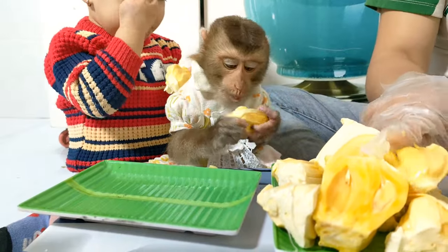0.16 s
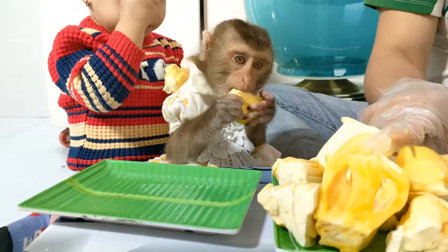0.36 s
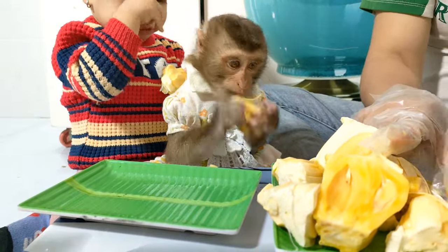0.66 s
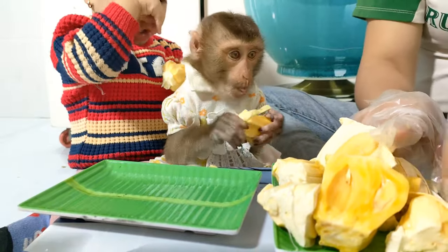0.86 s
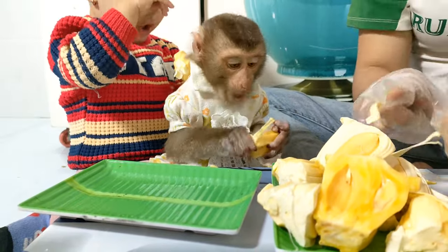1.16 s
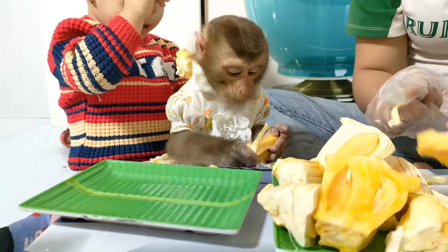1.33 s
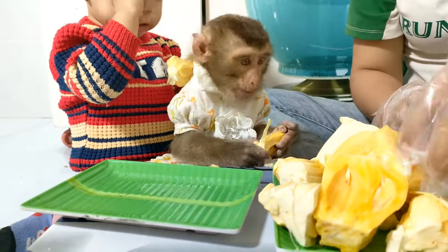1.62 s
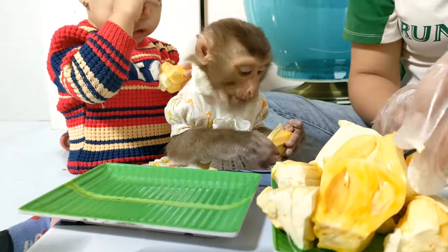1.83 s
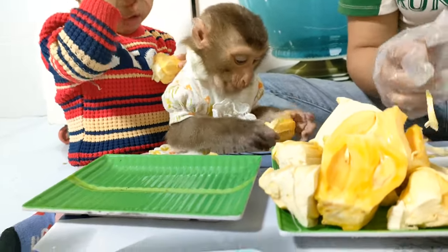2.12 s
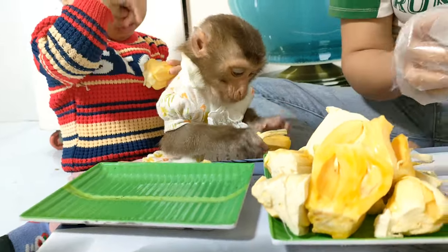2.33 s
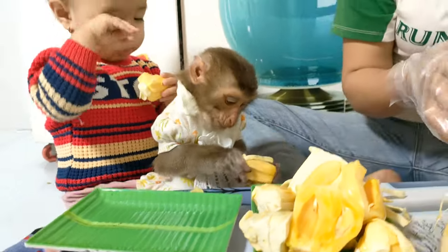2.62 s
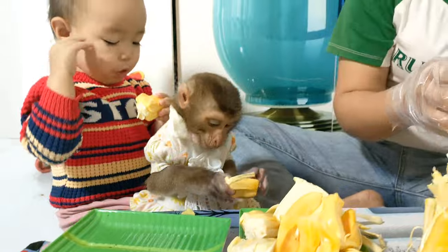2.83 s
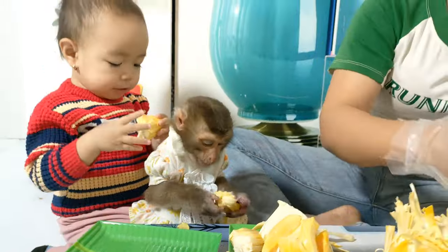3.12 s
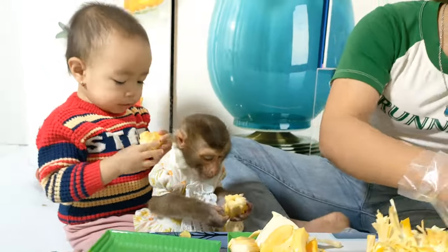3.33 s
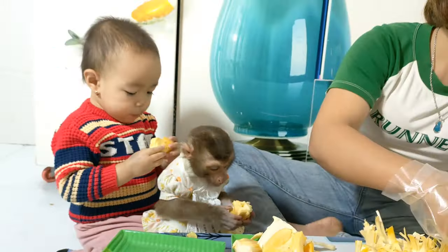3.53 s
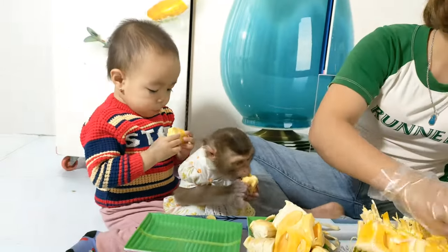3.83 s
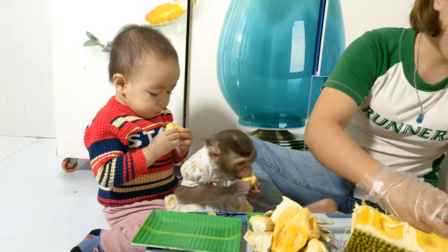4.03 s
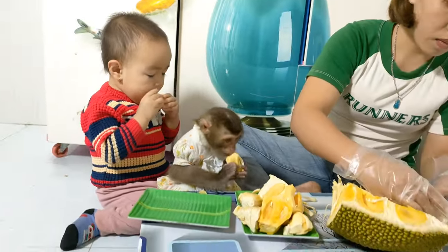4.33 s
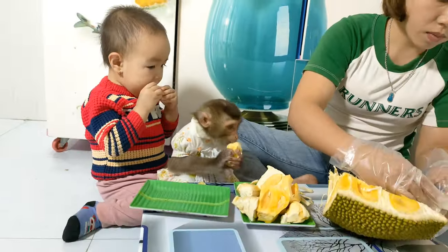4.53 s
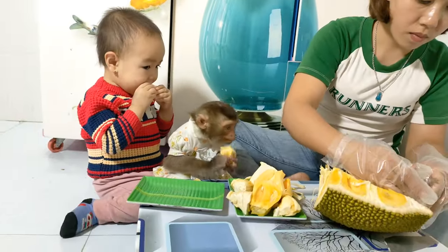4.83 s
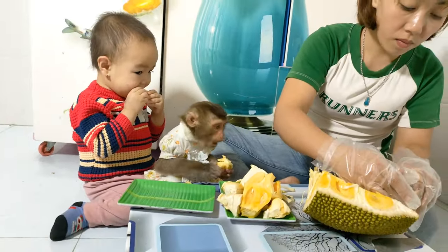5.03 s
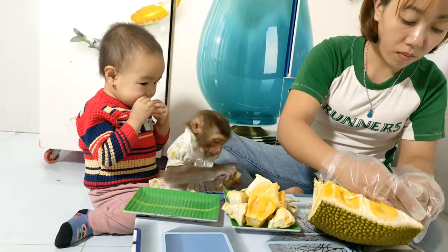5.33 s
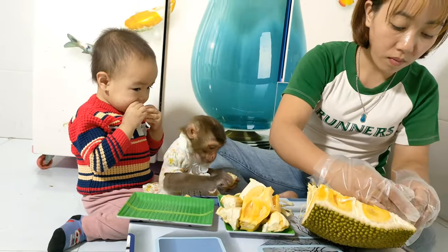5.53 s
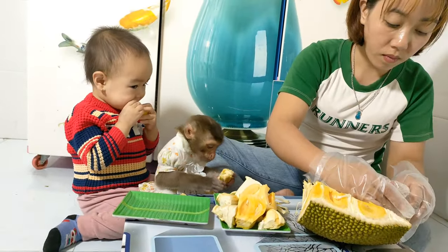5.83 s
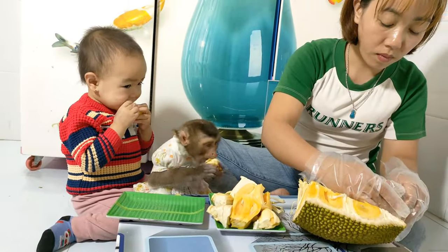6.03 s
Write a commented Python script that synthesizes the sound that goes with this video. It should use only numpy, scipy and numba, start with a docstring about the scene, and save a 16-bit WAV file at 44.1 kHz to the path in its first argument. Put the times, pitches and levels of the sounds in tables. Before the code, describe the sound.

Thin plastic gloves crinkle from the start as hands pull sticky fruit apart, about a metre from a phone in a tiled room. For the first two seconds the crackle is bright and leans left, with many sharp single snaps. Fruit and fingers thud softly on a tray around 0.3 and 1.2 seconds, and small wet ticks of pulp are scattered throughout. From 2 to 2.7 seconds the rustle grows denser and louder but less crisp. It swells again just after 3 seconds and near 3.9, where a sharper wet tick stands out. A faint hollow rub passes at about 4.4 seconds. Lighter crinkling continues to 5.5 seconds, nearly stops, then returns just after 6 with a tiny, thin rising squeak. A short reverberation and a quiet room hum and hiss lie under everything.

```python
"""Thin plastic gloves crinkle as hands pull sticky fruit apart, a metre from a phone in a tiled room.
Creases in the film buckle, each a click and a brief ring: swarms of tiny snaps with louder single ones.
Fruit and fingers thud softly on a tray and pulp lets go with wet ticks, both as damped modes.
A faint hollow rub and a thin rising squeak come late. The tiles add a short reverberation
over the room's hum and hiss, and the phone's two microphone ports give left and right."""
import sys
import numpy as np
from scipy import signal
from scipy.fft import rfft, irfft
from scipy.io import wavfile
from scipy.ndimage import uniform_filter1d
from numba import njit

SR = 44100
rng = np.random.default_rng(int(sys.argv[2]) if len(sys.argv) > 2 else 0)


def dump(signal):
    """Clip the signal to [-1, 1] and save it as 16-bit WAV at the path in sys.argv[1]."""
    limited = np.clip(np.atleast_2d(signal).T, -1, 1)
    pcm = np.round(limited * 32767).astype(np.int16)
    wavfile.write(sys.argv[1], SR, pcm)


N = 271656

# spectral envelope of the crinkling as heard: f/Hz, gain/dB; the treble falls steeply above 6.8 kHz to a notch
# near 7.8 kHz
CRINKLE_SPECTRUM = [(100, -42.5), (160, -12.5), (310, -12), (700, -12.5), (1000, -5.5), (1460, -9.5),
                    (2000, -1.5), (2400, 0), (2700, 5), (3900, 7), (5000, -1), (6000, -7.5), (6800, -17.5),
                    (7300, -27.5), (7800, -40.5), (8500, -34), (9400, -28), (11200, -24.5), (13600, -34),
                    (14600, -36)]
# coherence of left and right: f/Hz, coherence (0-1)
COHERENCE = [(40, 0.37), (130, .5), (400, .5), (850, .8), (1400, .3), (2500, .05)]
# colour and side of the rustle: t/s, crisp gain/dB, sheen gain/dB, body gain/dB, main left minus right/dB
FILM_FACING = [(0, 15, 4, 11, 8), (.3, 10.5, 5.5, 4.5, 7), (.5, 12.5, 5, 8, 7.5), (.65, 12.5, 1, 7.5, 6.5),
               (.85, 16, 7, 10, 8.5), (1.15, 10.5, 6, 12.5, 7.5), (1.45, 15, 11.5, 10.5, 6.5),
               (1.75, 10.5, 6.5, 9.5, 7), (2.1, 1.5, 0.5, 1, 6.5), (2.3, -7, 0, 3, 8),
               (2.5, -9, 1.5, -2, 4), (2.63, -27, -4, 4, 4.5), (2.85, -23, 5.5, 5.5, 4.5),
               (3.1, -10, 6, 5.5, 4.5), (3.4, -6, 2, 2.5, 1.5), (3.7, -4, 2.5, 1, 2), (4, -1.5, 4, 3, 4.5),
               (4.3, 6.5, -2, 2.5, 4), (4.45, 11, 7, 6, 6), (4.6, 13, 6, 6.5, 4), (4.85, 7.5, 6.5, 3.5, 2),
               (5.1, 1.5, 4, 0, 0.5), (5.22, 5, 5.5, 6, 2), (5.36, 12.5, 11, 6, 3), (5.5, 9, 6.5, 2.5, 3.5),
               (5.8, 3, 5, 10, 6), (6.16, 9, 13, 5.5, 5)]
# left minus right in the treble as the phone turns: t/s, crisp band/dB, sheen band/dB
TREBLE_BALANCE = [(0, 16, 15), (1.5, 19, 16.5), (2.9, 0, 6.5), (3.5, -13, 6.5), (4.4, -11, 2),
                  (4.8, -8, -2), (5.6, -14, -2), (6.16, -10, -2)]


def undb(db):
    """Amplitude ratio of a level."""
    return 10 ** (np.asarray(db) / 20)


def at_times(table, t):
    """Columns of a (t/s, ...) table, interpolated at times t."""
    times, *columns = np.transpose(table)
    return [np.interp(t, times, column) for column in columns]


def at_frequencies(table, hz):
    """An (f/Hz, value) table, interpolated on a logarithmic frequency axis."""
    f, values = np.transpose(table)
    return np.interp(np.log(hz + 1), np.log(f), values)


def wander(rate_hz):
    """Slow modulation: random values joined by straight ramps."""
    hold = int(SR / rate_hz)
    return 0.52 * uniform_filter1d(np.repeat(rng.standard_normal(N // hold + 1), hold), hold)[:N]


def superpose(onsets, sounds):
    """Linear superposition: short stereo sounds add, each from its onset."""
    out = np.zeros((2, N))
    for t, sound in zip(onsets, sounds):
        start = max(int(t * SR), 0)
        out[:, start:start + sound.shape[1]] += sound[:, :N - start]
    return out


def crinkle_response(size):
    """Causality: the crinkle's spectrum as a minimum-phase filter, by folding its cepstrum."""
    gain_db = at_frequencies(CRINKLE_SPECTRUM, np.fft.rfftfreq(size, 1 / SR))
    cepstrum = irfft(gain_db * np.log(10) / 20, size)
    cepstrum[1:size // 2] *= 2
    cepstrum[size // 2 + 1:] = 0
    return np.exp(rfft(cepstrum))


def bands(f, edges_hz=(2174, 5566, 7050)):
    """Complementary crossover: body, main, crisp and sheen bands, low to high, sum to one."""
    above = [1, *(1 / (1 + (edge / (f + 1)) ** 10) for edge in edges_hz), 0]
    return [lower - upper for lower, upper in zip(above, above[1:])]


def shadow_db(t):
    """Diffraction: left minus right in each band; long waves bend round the phone and cast no shadow."""
    return [0 * t, at_times(FILM_FACING, t)[3], *at_times(TREBLE_BALANCE, t)]


def cohere(spectra, f):
    """Spatial coherence: long waves reach both ports partly alike, short ones hardly so."""
    coherence = at_frequencies(COHERENCE, f)
    mid, side = (spectra[0] + spectra[1]) / 2, (spectra[0] - spectra[1]) / 2
    return np.array([np.sqrt(1 + coherence) * mid + k * np.sqrt(1 - coherence) * side for k in (1, -1)])


@njit
def patch_rings(starts, hz, t60, amplitude):
    """Free vibration: each buckled patch rings at its own frequency and decays exponentially."""
    out = np.zeros(N)
    for k in range(len(starts)):
        pole = np.exp(2j * np.pi * hz[k] / SR - np.log(1000.) / (t60[k] * SR))
        phasor = amplitude[k] + 0j
        for i in range(starts[k], min(starts[k] + int(t60[k] * SR * .7) + 2, N)):
            out[i] += phasor.real
            phasor *= pole
    return out


def rustle(count=24000, click_db=1.5, burst_db=2.2, flicker_db=2.2):
    """Buckling: swarms of creases each radiate a click and a ring, met at another angle by each port."""
    # how hard the hands work the film: t/s, level/dB
    effort = [(0, -48.5), (.09, -58), (.19, -48), (.36, -46), (.43, -42.5), (.5, -43.5), (.59, -43.5),
              (.66, -53), (.695, -44.5), (.72, -51.5), (.815, -50.5), (.84, -44), (.875, -46.5), (.9, -48),
              (.925, -52), (.95, -56), (1.02, -49), (1.12, -57.5), (1.2, -53.5), (1.34, -53), (1.445, -53),
              (1.47, -48), (1.5, -46), (1.525, -49.5), (1.59, -54), (1.74, -53), (1.91, -50), (1.98, -48.5),
              (2.03, -39.5), (2.13, -48.5), (2.19, -35.5), (2.29, -33.5), (2.345, -35.5), (2.36, -39.5),
              (2.43, -39), (2.5, -45.5), (2.63, -32), (2.79, -47), (2.9, -46.5), (3.04, -45.5), (3.06, -37),
              (3.1, -40.5), (3.17, -43), (3.2, -37.5), (3.225, -41), (3.27, -41), (3.34, -39),
              (3.49, -42.5), (3.57, -45.5), (3.67, -45.5), (3.73, -48.5), (3.82, -47), (3.845, -39.5),
              (3.86, -35), (3.95, -38), (4.07, -41), (4.15, -39.5), (4.19, -45.5), (4.29, -49),
              (4.41, -53.5), (4.51, -50.5), (4.54, -50), (4.6, -44), (4.73, -50), (4.8, -46.5), (4.97, -48),
              (5.03, -48), (5.15, -51.5), (5.18, -45), (5.24, -45.5), (5.37, -53.5), (5.46, -43.5),
              (5.74, -64), (6.09, -63.5), (6.16, -40.5)]
    spread_db, largest_db = 4., 12.  # crease strength above the weakest
    pocket_low_hz, pocket_high_hz, pocket_s, pocket_share = 2400, 5600, .04, .22
    t, f = np.arange(N) / SR, np.fft.rfftfreq(N, 1 / SR)
    when, strength, polarity, pitch, decay, *angle, pocket_draw = rng.random((count, 8)).T
    amplitude = undb(np.minimum(-spread_db * np.log(1 - strength), largest_db)) * np.sign(polarity - .5)
    t60 = .016 * (1.7 + decay)
    # for a moment the crumpled film holds two pockets, and many creases ring near their pitches
    pocket_pitch = rng.random((int(N / SR / pocket_s) + 1, 2))
    pockets = pocket_low_hz * (pocket_high_hz / pocket_low_hz) ** pocket_pitch
    pocket_hz = pockets[(when * N / SR / pocket_s).astype(int), (decay > .5).astype(int)]
    nominal_hz = np.where(pocket_draw < pocket_share, pocket_hz, 60 + 14800 * pitch ** 1.209)
    swarm = np.zeros((2, N))
    for port in range(2):
        starts = np.clip((when * N + 40 * angle[port]).astype(np.int64), 0, N - 1)
        hz = nominal_hz * (1.039 + 0.106 * angle[1 - port])
        swarm[port] = patch_rings(starts, hz, t60, amplitude / np.sqrt(t60 * SR / 14))
        np.add.at(swarm[port], starts, amplitude * undb(click_db))
    # one crease sets off its neighbours, so the swarm comes in bursts
    swarm *= undb(burst_db * wander(70))
    spectrum = cohere(rfft(swarm), f) * crinkle_response(N)
    parts = [irfft(spectrum * band, N) for band in bands(f)]
    crisp_db, sheen_db, body_db, _ = at_times(FILM_FACING, t)
    film = sum(part * undb(gain_db + side_db * [[.5], [-.5]] + flicker_db * wander(30))
               for part, gain_db, side_db in zip(parts, (body_db, 0, crisp_db, sheen_db), shadow_db(t)))
    main_rms = np.std(parts[1].mean(0))
    return film / main_rms * undb(at_times(effort, t)[0])


def room_tone(level_db=-57, balance_db=4):
    """Ambient noise: the room's quiet hum and hiss form a continuous spectrum."""
    # spectral density of the room's noise: f/Hz, relative level/dB
    density = [(12, -18), (20, 11), (124, 1.5), (189, 4.5), (656, -21.5), (2220, 4.5), (3650, 3.5),
               (6180, -7.5), (8160, -35.5), (11400, -22.5), (15000, -37)]
    f = np.fft.rfftfreq(N, 1 / SR)
    white = cohere(rfft(rng.standard_normal((2, N))), f)
    noise = irfft(white * undb(at_frequencies(density, f)), N)
    pan = undb([[balance_db / 2], [-balance_db / 2]])
    return noise / np.std(noise.mean(0)) * undb(level_db + 0.5 * wander(4.56)) * pan


def snaps(flip_db=5, ring_db=1.0, relative_bandwidth=.38, size=2048):
    """Snap-through: a crease flips with a click and a ring; the film around gives way in a patter."""
    # single creases: t/s, peak level/dB, ring f/Hz, crisp gain/dB, sheen gain/dB, patter gain/dB
    creases = [(0.025, -30, 5060, 17, 6, -5), (0.0629, -28, 4260, 23, -3, -9),
               (0.1043, -19, 4000, 18, 15, -16), (0.1141, -38, 5560, 22, 11, -10),
               (0.1528, -24.5, 3830, 29, 11, -7), (0.1639, -24, 3960, 22, 13, -8.5),
               (0.1901, -23.5, 3750, 5, 7, -11), (0.2319, -22.5, 4480, 18, 10, -9.5),
               (0.2817, -21.5, 4110, -3, 1, -15), (0.3246, -17, 2780, 16, -5, -7),
               (0.3494, -23, 4910, 7, 4, -8), (0.3867, -24, 5360, 14, 1, -5),
               (0.3939, -26, 4110, 6, 3, -14), (0.4201, -22.5, 3900, -6, -2, 1),
               (0.4272, -22.5, 2880, 1, 2, -2), (0.4525, -32, 3750, 3, 0, -8),
               (0.4793, -24.5, 3960, 15, 19, -5), (0.496, -21, 3010, -7, 6, -25),
               (0.5205, -20.5, 3920, 5, -2, -6), (0.5633, -15, 3060, 6, 5, -13),
               (0.6932, -32, 5190, 5, 4, -3), (0.7396, -27, 4200, 10, -2, -10),
               (0.7519, -15.5, 5840, 27, 5.5, -16), (0.8273, -27, 3920, 31, 9, -9),
               (0.8414, -24, 3080, 11, 4, 0), (0.8559, -26, 3060, -3, -6, -11),
               (0.8686, -12.5, 3150, 6, 9, -15), (0.8842, -19.5, 4260, 13, -7, -10.5),
               (0.8998, -24, 3120, 1, -4, -10), (0.9664, -27, 3010, 7, 6, -15),
               (1.0004, -21.5, 3030, -3, 0, -9), (1.0153, -30, 3640, 16, 14, -12),
               (1.0233, -25, 3320, 6, 1, -22), (1.044, -29, 3120, 7, 6, -8),
               (1.1665, -31, 4000, 1, -11, -4), (1.2108, -25.5, 4100, 15, 12, -9.5),
               (1.2315, -29, 3940, -5, 2, -11), (1.2394, -23, 4130, 19, 11, -10),
               (1.254, -24, 4480, 6, 11, -13), (1.2656, -40, 4670, 1, -5, -7),
               (1.3269, -21, 3960, 4, 9, -13), (1.3389, -24, 2980, 19, 16, -14),
               (1.3496, -30, 4130, 16, 6, -10), (1.3638, -29, 5660, 17, 12, -15),
               (1.393, -28, 3250, 23, 13, -9), (1.3998, -24, 2780, 6, 7, -20),
               (1.4098, -30, 2930, 12, 0, -2), (1.4273, -20, 5300, 8, 5, -11),
               (1.4574, -27, 4330, 13, 6, -5), (1.4713, -27, 5040, 11, 10, -4),
               (1.4884, -24, 4650, 10, 0, -9), (1.5137, -26, 3920, 6, 13, -18),
               (1.5361, -18, 4970, 18, 4, -13.5), (1.5466, -27, 3920, 11, 3, -7),
               (1.6002, -36, 4440, 15, -8, -19), (1.6113, -34, 3010, 10, 1, -6),
               (1.6176, -15.5, 4630, 5, -3, -14.5), (1.6468, -30, 4180, 20, 8, -12),
               (1.6783, -22.5, 4300, -15, -12, -14.5), (1.7007, -47, 3010, 14, 5, -11),
               (1.7131, -39, 3960, 1, -4, -14), (1.7483, -39, 3920, 11, 11, -8),
               (1.7884, -34.5, 3450, -4, -10, -6), (1.8032, -30.5, 3250, -18, -5, -5),
               (1.8282, -29, 4610, 0, -9, -9), (1.8847, -31, 4440, -8, 1, 2),
               (1.9724, -23.5, 4110, -9, -2, -8), (1.993, -19, 5030, 5, -2, -12),
               (2.0554, -23, 3120, -2, 6, -8), (2.0811, -18, 3340, -5, -8, -11.5),
               (2.1518, -27, 4200, -17, -13, -5), (2.1844, -13.5, 4100, -12, -10, -13),
               (2.1909, -29, 3730, -5, 2, -6), (2.2302, -17, 3340, -17, 2, -10),
               (2.2381, -15.5, 4020, -8, -1, 4), (2.2852, -19, 3770, -14, -8, 4),
               (2.2899, -23, 3600, -10, -7, -1), (2.2941, -29, 3980, -12, -6, -10),
               (2.3007, -26, 3960, -12, -7, -6), (2.306, -24, 2780, -17, -9, 3),
               (2.3446, -32, 4130, -9, -3, -16), (2.3696, -28, 3750, -18, 0, -13),
               (2.4009, -20.5, 4180, -16, 5, 2), (2.4034, -21, 3640, -12, 8, -11),
               (2.4254, -28, 3270, -4, -7, -5), (2.4569, -26, 2760, -14, -8, -14),
               (2.4775, -31, 2650, -8, -2, -5), (2.5303, -29.5, 2760, -20, 0, -5),
               (2.5998, -23, 2750, -22, -11, -10), (2.633, -23, 2840, -18, -7, -6),
               (2.6811, -26, 3640, -16, -6, -7), (2.6937, -24, 3750, -21, -6, -7),
               (2.8125, -35, 3340, -19, 0, -4), (2.8387, -29, 3400, -9, 1, -9),
               (2.8736, -28.5, 3600, -21, -10, 3), (2.8859, -39, 3100, -17, -5, -15),
               (2.9238, -39, 3420, -8, 8, -18), (2.9561, -31, 2990, -18, -5, -5),
               (3.011, -28.5, 3940, -17, 1, -20), (3.0536, -27, 3730, -4, 1, -6),
               (3.0741, -24, 3600, 4, 6, -6), (3.1035, -37, 2780, -15, -4, -11),
               (3.1327, -26.5, 3770, 1, 10, -8), (3.1453, -33, 3770, -8, -1, -15),
               (3.1959, -26, 3340, -14, 8, -7), (3.2047, -25.5, 3600, -21, -1, -7),
               (3.2106, -25, 3600, -22, -7, -10), (3.2356, -21, 3320, -19, 8, -10),
               (3.2665, -25.5, 3510, -22, -4, -3), (3.3054, -37, 3450, -21, -3, -12),
               (3.3315, -35, 3730, -14, -7, -15), (3.3511, -36, 3880, -10, -3, -9),
               (3.3807, -25, 3450, -22, -6, -5), (3.5123, -33, 3880, -20, -8, -6),
               (3.5386, -36, 3940, -10, 10, -12), (3.5989, -29, 3570, -15, 7, -10),
               (3.6219, -32.5, 3660, -12, -10, -12), (3.6459, -29, 4010, -11, 5, -17),
               (3.7007, -30, 3810, -20, -7, -12), (3.759, -27, 3210, -16, -6, -11),
               (3.7723, -39, 3750, -2, 1, -20), (3.7809, -31, 3510, -10, -5, -5),
               (3.8277, -29, 3510, -20, 0, -10), (3.8545, -18.5, 3400, 6, 13, -7),
               (3.8774, -28, 3810, -1, 2, -19), (3.8953, -28, 3490, -9, 4, -16),
               (3.9309, -27, 3730, 1, -3, 6), (4.0411, -22, 3570, -16, -1, -16),
               (4.0886, -30, 3550, -19, -7, -13), (4.1053, -22.5, 3580, -2, 2, 0),
               (4.2008, -28, 3770, -17, -9, -12), (4.216, -27.5, 3940, 12, -3, -10),
               (4.2488, -17.5, 3500, -23, 1, -16.5), (4.2862, -32, 3470, -4, -8, -14),
               (4.3534, -32, 4030, 2, -9, -23), (4.4479, -32, 3420, -7, -3, -12),
               (4.4633, -30.5, 3420, -3, -4, -6), (4.5292, -27.5, 3620, 17, 7, 4),
               (4.5411, -37, 3730, 4, -1, -14), (4.5737, -28, 3470, 20, -2, -4),
               (4.5948, -28, 3750, -1, -1, -7), (4.6142, -31, 3550, -2, 11, -22),
               (4.6661, -26, 4030, -13, -4, -14), (4.7611, -27, 4200, -3, 0, -13),
               (4.7697, -36, 3640, 1, 1, -8), (4.9702, -34, 4010, 0, -2, -6),
               (4.9889, -32.5, 2800, -4, 0, -8), (5.1744, -28, 3500, -8, -5, -16),
               (5.2166, -31.5, 3770, 5, 1, 0), (5.2345, -28, 4050, 0, -3, -10),
               (5.4287, -32, 3170, -8, -3, -9), (5.4914, -29, 3120, 2, -3, -9),
               (5.6072, -45, 3880, -3, -2, -11), (5.6817, -39.5, 2200, 18, 0, -7),
               (5.7696, -40, 3380, -6, 2, -9), (5.8502, -45, 1810, 10, -4, -20),
               (5.969, -38, 2280, -9, -7, -4), (6.1252, -28, 3450, -1, 5, -7),
               (6.1416, -27, 2910, -3, 1, -3)]
    onset, peak_db, ring_hz, crisp_db, sheen_db, patter_db = np.transpose(creases)[:, :, None, None]
    lead = 160  # samples of patter before the flip
    t, f = (np.arange(size) - lead) / SR, np.fft.rfftfreq(size, 1 / SR)
    stretch = undb((patter_db + 15) / 2)  # more patter also lasts longer
    rise_s, t60 = .0054 * stretch, .016 * stretch
    fall_db = 60 * np.maximum(t / t60, -t / rise_s)
    push = rng.standard_normal((len(onset), 2, size)) ** 3 / 4 * undb(patter_db - fall_db)
    # the flip meets the right port inverted and slightly shifted in time
    right_arrival = lead + rng.integers(-4, 16, len(onset))
    push[:, 0, lead] += undb(flip_db)
    push[np.arange(len(onset)), 1, right_arrival] -= undb(flip_db)
    damping = 1j * relative_bandwidth * f * ring_hz
    resonance = 1 + undb(ring_db) * damping / (ring_hz ** 2 - f ** 2 + damping)
    shares = bands(f)
    colour_db = crisp_db * shares[2] + sheen_db * shares[3]
    shade_db = sum(db * share for db, share in zip(shadow_db(onset), shares)) * [[.5], [-.5]]
    clicks = irfft(rfft(push) * resonance * crinkle_response(size) * undb(colour_db + shade_db), size)
    clicks *= undb(peak_db) / np.abs(clicks.mean(1, keepdims=True)).max(2, keepdims=True)
    return superpose(onset.ravel() - lead / SR, clicks)


def damped_modes(blows, modes, roughness, balance_db, size=8192):
    """Modal decay: each mode of a pushed body gives a ring and a band of noise that dies with it."""
    onset, peak_db, nominal_hz, decay_s = np.transpose(blows)[:, :, None]
    t, f = np.arange(size) / SR, np.fft.rfftfreq(size, 1 / SR)
    knocks = 0
    for ratio, gain_db, decay_share in modes:
        hz, t60 = ratio * nominal_hz, np.maximum(decay_share * decay_s, .004)
        white = rfft(rng.standard_normal((len(onset), size)))
        rumble = irfft(white / (1 + ((f - 1.08 * hz) / (0.38 * hz)) ** 4), size)
        ring = np.sin(2 * np.pi * hz * t) + roughness * rumble / rumble.std(1, keepdims=True)
        ring *= undb(-60 * t / t60) * (1 - np.exp(-t * hz * 3)) ** 2
        highpass = (1j * f / (1j * f + .45 * hz)) ** 3  # nothing sounds far below the ring
        ring = irfft(rfft(ring) * highpass, size)
        knocks = knocks + ring * undb(peak_db + gain_db) / np.abs(ring).max(1, keepdims=True)
    pan = undb([[balance_db / 2], [-balance_db / 2]])
    return superpose(onset.ravel(), knocks[:, None] * pan)


def tray_thuds():
    """Impact excitation: soft blows on fruit and tray set low, damped modes ringing."""
    # soft blows: t/s, first mode's peak level/dB, f/Hz, T60/s
    blows = [(.284, -36.5, 161, 0.13), (.317, -39, 148, 0.11), (.331, -50, 142, 0.091),
             (.39, -40, 173, 0.16), (.402, -34, 104, 0.06), (.84, -47, 194, 0.092),
             (1.1505, -36.5, 206.7, 0.25), (1.24, -46.5, 211, 0.16), (1.1505, -33.5, 362, 0.065),
             (1.185, -38.5, 310, 0.097), (1.693, -48, 151, 0.1), (1.5, -55, 246, .1), (.52, -48, 287, .15),
             (.68, -52, 208, 0.13), (1.01, -55.5, 170, .08), (4.06, -54, 200, 0.11), (4.99, -66, 150, 0.08),
             (5.46, -45, 503, 0.013), (2.103, -47, 248, 0.21), (2.619, -53, 500, .15),
             (2.66, -49, 199, 0.15), (3.329, -51, 160, 0.074), (3.603, -47, 247, 0.19),
             (3.64, -47.5, 201.7, 0.32), (3.849, -44, 480, 0.054), (4.595, -52.5, 342, 0.22),
             (5.237, -53, 427, 0.13), (5.849, -45, 320, 0.011), (5.993, -56, 184, 0.061),
             (6.134, -48.5, 294, 0.049)]
    # modes of each blow: frequency ratio, gain/dB, T60 ratio
    modes = [(1, 0, 1), (1.62, -4, .5), (2.7, -26, .15)]
    return damped_modes(blows, modes, roughness=.3, balance_db=2.5)


def pulp_ticks():
    """Sudden release: sticky pulp lets go and excites one brief, noisy resonance."""
    # wet ticks, and a 2 kHz ring under the loud snap at 3.854 s: t/s, peak level/dB, nominal f/Hz, T60/s
    releases = [(.451, -37, 960, 0.043), (.7, -40, 1010, 0.022), (.883, -33, 1770, 0.012),
                (.983, -40.5, 1010, 0.021), (1.175, -35, 990, 0.012), (1.338, -34.5, 1530, 0.0042),
                (1.462, -37.5, 905, 0.047), (1.79, -41, 890, 0.047), (1.535, -31.5, 1020, 0.0056),
                (2.399, -46, 1530, 0.027), (2.505, -42.5, 1040, 0.013), (2.626, -48, 895, 0.033),
                (2.832, -40, 870, 0.014), (3.146, -33.5, 1210, 0.012), (3.318, -32, 1350, 0.0061),
                (3.445, -42, 1050, 0.024), (3.576, -43, 1230, 0.024), (3.8545, -28, 1090, 0.023),
                (3.8538, -22, 2000, 0.01), (4.01, -35, 1310, 0.0096), (4.102, -40, 1280, 0.012),
                (4.164, -49, 746, 0.017), (4.824, -36.5, 1190, 0.025), (5.184, -39.5, 1450, 0.04),
                (5.849, -36, 1400, 0.0031), (5.995, -54, 895, .008), (6.125, -38, 1520, 0.028)]
    # the mode of each tick: frequency ratio, gain/dB, T60 ratio
    modes = [(0.96, 0.0091, 1)]
    return damped_modes(releases, modes, roughness=1.0, balance_db=0.5)


def rub(middle_s=4.42, length_s=.36, centre_hz=1120, width_hz=400, level_db=-58):
    """Sliding friction: hiss in one hollow resonance swells and fades."""
    t, f = np.arange(N) / SR - middle_s, np.fft.rfftfreq(N, 1 / SR)
    hiss = irfft(rfft(rng.standard_normal(N)) / (1 + (2 * (f - centre_hz) / width_hz) ** 2), N)
    swell = np.cos(np.pi * np.clip(t / length_s, -.5, .5))
    return hiss / hiss.std() * undb(level_db) * swell


def squeak(start_s=6.079, length_s=.056, start_hz=3830, glide_hz_per_s=10000, level_db=-47.5, fade_s=.007):
    """Linear chirp: one thin tone glides upward."""
    t = np.arange(N) / SR - start_s
    envelope = np.clip(np.minimum(t, length_s - t) / fade_s, 0, 1) ** 2
    phase = 2 * np.pi * (start_hz + glide_hz_per_s * t / 2) * t
    return np.sqrt(2) * undb(level_db) * envelope * np.sin(phase)


def reverberation(direct, t60=.3, gain_db=-11, size=16384):
    """Diffuse field: tiles and walls return a short tail that decays exponentially."""
    t, f = np.arange(size) / SR, np.fft.rfftfreq(size, 1 / SR)
    tail = irfft(cohere(rfft(rng.standard_normal((2, size))), f), size)
    tail *= undb(-60 * t / t60) * (t > .003)
    tail *= undb(gain_db) / np.sqrt((tail ** 2).sum(1, keepdims=True))
    return signal.fftconvolve(direct, tail, axes=1)[:, :N]


def scene():
    """Superposition: direct sound, its reverberation and the room tone add at the ports."""
    film = rustle() + snaps()
    fruit = tray_thuds() + pulp_ticks()
    handling = film + rub() + squeak()
    return handling + fruit + reverberation(handling + undb(-4) * fruit) + room_tone()


def record(dry):
    """Band limiting: the phone cuts the treble steeply above 14.6 kHz."""
    return signal.sosfilt(signal.ellip(10, .2, 80, 14600, fs=SR, output="sos"), dry)


dry = scene()
out = record(dry)
dump(out)
```